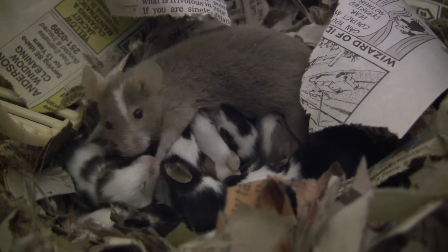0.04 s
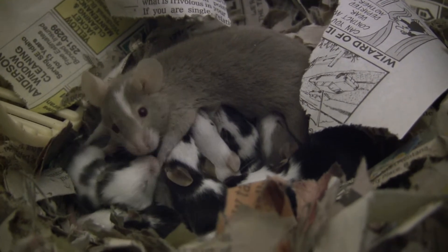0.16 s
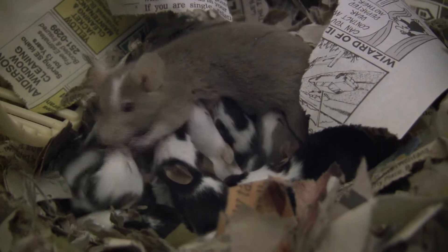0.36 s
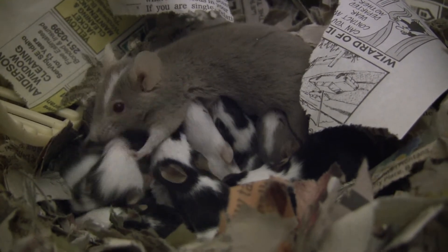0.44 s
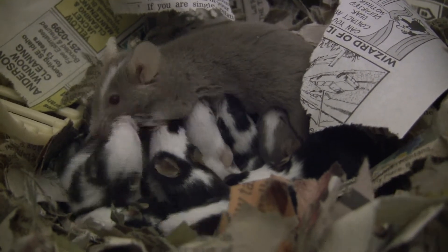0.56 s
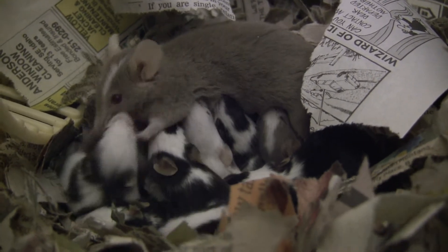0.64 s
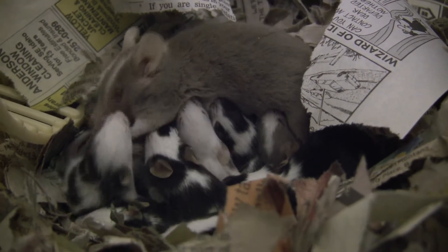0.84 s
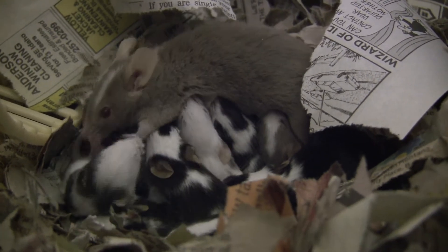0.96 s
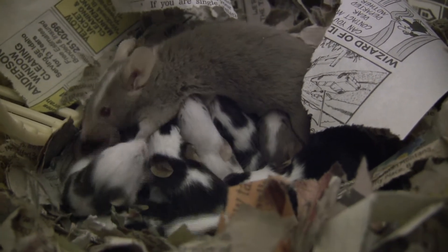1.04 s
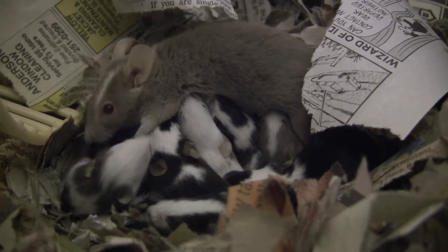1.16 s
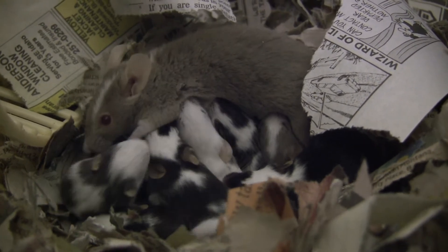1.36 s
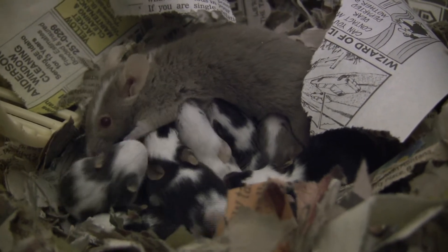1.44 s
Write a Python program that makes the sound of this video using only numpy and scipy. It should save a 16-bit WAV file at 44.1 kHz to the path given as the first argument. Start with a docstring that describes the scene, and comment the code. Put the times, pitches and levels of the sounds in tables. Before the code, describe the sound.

Baby mice squeak three times over steady hiss, low hum and a faint high whine. The first, loudest squeak runs 0.2-0.39 seconds, the second 0.49-0.7, the softer third 0.89-1.1. Each thin whistle breaks into buzzing rasp, then ends clean and higher. Very soft bedding shuffles come between 0.86 and 1.5; bright paper ticks start at 1.26, sharpest near 1.42. Close, mono, slight short room tail.

```python
"""A quiet room opens on steady filtered-noise hiss and low hum, with a faint whine of thin sines that waver
slightly and quickly in pitch. Baby mice in a paper nest then squeak three times, from 0.2, 0.49 and 0.89 s:
each is a thin whistle near 4-5 kHz with two overtones that breaks into rasps of random puffs and split-pitch
buzzes, then ends clean and higher. Soft shuffles of band-shaped noise run from the third squeak to near 1.5 s.
Paper ticks, bursts of noise through bright resonances, follow the squeaks from 1.26 s."""
import sys
import numpy as np
from scipy import signal
from scipy.fft import rfft, irfft
from scipy.io import wavfile

SR = 44100
rng = np.random.default_rng(int(sys.argv[2]) if len(sys.argv) > 2 else 0)


def waveform_to_disk(signal):
    """Save audio, clipped to [-1, 1], as 16-bit WAV at the path in sys.argv[1]."""
    frames = np.transpose(np.atleast_2d(signal))
    scaled = np.clip(frames, -1, 1) * 32767
    samples = np.round(scaled).astype(np.int16)
    wavfile.write(sys.argv[1], SR, samples)


N = 66150
T = np.arange(N) / SR  # s

# steady room hiss and low hum: (frequency [Hz], relative level [dB])
HISS_COLOUR = [(25, -13.5), (55, -11), (90, -1.5), (125, 0), (165, 3), (215, -11), (310, -5.5),
               (420, -11.5), (620, -9), (800, -9), (950, 3), (1130, -1), (1300, -3), (2000, -4.5),
               (3300, -7), (4500, -7.5), (5050, -4.5), (5700, -7.5), (7200, -11), (8000, -11),
               (9200, -15.5), (11200, -14.5), (12300, -27.5), (15500, -25)]
HISS_DB = -48.5  # rms
# steady whine lines: (frequency [Hz], rms level [dB])
WHINE_LINES = [(1168, -63), (4969, -60), (5550, -64), (5776, -66.5), (8032, -77)]
WHINE_DRIFT_HZ, WHINE_DRIFT_RATE_HZ = 7.06, 25.6  # rms pitch waver and its rate
ROOM_T60_S, ROOM_DB = 0.15, -14  # decay time and tail level

# ticks of the paper bedding: (time [s], level before the low-pass [dB], decay time to -60 dB [s])
TICKS = [(1.262, -46, 0.24), (1.3548, -46.5, 0.16), (1.4167, -37.5, 0.04), (1.4215, -46, .06)]
# resonances of the ticks: (frequency [Hz], width [Hz], gain [dB])
TICK_MODES = [(3120, 360, -9), (4030, 240, 2), (4975, 135, 7.5), (6030, 130, 0.5), (6200, 200, -14),
              (7630, 250, -27)]
TICK_TOP_HZ = 10000
# soft shuffles of bodies in the bedding: (centre time [s], length [s], centre frequency [Hz], level [dB])
SHUFFLES = [(0.862, 0.013, 13490, -61), (.96, 0.077, 426, -63), (1.127, 0.048, 310, -59.5),
            (1.485, 0.038, 148.6, -52)]

# course of each squeak before roughness and microphone colour:
# (time [s], pitch [Hz], whistle level [dB], octave level [dB])
FIRST_SQUEAK = [(0.2, 4316, -44, -62), (0.204, 4364, -38, -57), (0.216, 4430, -37, -46),
                (0.226, 4196, -33.5, -29), (0.234, 4111, -22, -45), (0.248, 4088, -24, -52.5),
                (0.274, 3724, -33, -30), (0.296, 3892, -29, -41.5), (0.316, 3896, -23.5, -45),
                (0.328, 3882, -31, -33), (0.342, 3908, -25, -46), (0.354, 4484, -30.5, -36),
                (0.366, 4495, -31, -41), (0.374, 4879, -26.5, -45), (0.386, 5050, -41, -68),
                (0.392, 4921, -71, -68)]
SECOND_SQUEAK = [(0.486, 4099, -51, -68), (0.49, 4100, -33.5, -63), (0.496, 3802, -33.5, -30.5),
                 (0.506, 3892, -30, -38.5), (0.514, 3828, -39, -41), (0.524, 3712, -34.5, -33),
                 (0.532, 4092, -30.5, -56), (0.544, 4116, -27.5, -50), (0.59, 4285, -41.5, -42),
                 (0.594, 4447, -36.5, -54), (0.624, 4570, -31, -54), (0.632, 4490, -44.5, -38),
                 (0.642, 4411, -37, -58), (0.656, 5047, -30, -80), (0.664, 5062, -29.5, -60),
                 (0.694, 4756, -45, -73), (0.7, 4559, -53, -73)]
THIRD_SQUEAK = [(0.893, 4053, -39, -64), (0.895, 4077, -45, -66), (0.925, 4095, -43.5, -68),
                (0.933, 4733, -33, -60), (0.941, 5009, -31, -55), (0.957, 5023, -28.5, -41.5),
                (0.993, 5092, -38, -47), (1.011, 5026, -34.5, -56), (1.029, 5370, -43, -52.5),
                (1.041, 5550, -32.5, -54), (1.057, 5466, -34.5, -60), (1.067, 5431, -58, -54),
                (1.075, 5249, -38.5, -77), (1.081, 5120, -42.5, -66), (1.095, 5120, -49, -80)]
EDGE_S, SWITCH_S = 0.0036, 0.0025  # fade of a squeak; flip between clean and rough
THIRD_DB, THIRD_OCTAVE_DB = -36, -15  # third harmonic, relative to the whistle and to the octave
WAVER, WAVER_HZ = 0.0026, 307  # pitch unsteadiness at all times (rms share of pitch, rate)
JITTER, JITTER_HZ = .022, 900  # added pitch scatter at full roughness (rms share of pitch, rate)
SHIMMER, SHIMMER_HZ = 0.62, 324  # level flutter at full roughness (depth 0-1, rate)
ROUGH_WHISTLE_DB, ROUGH_OCTAVE_DB = -2.5, -11.5  # change of the clean lines at full roughness

# chaotic stretches: (start [s], end [s], roughness [clipped to 0-1], starting level of the throat noise [dB],
# level slope [dB/s], growl relative to the throat noise [dB])
RASPS = [(0.204, .231, 1.07, -38.5, 80, -4.5), (.345, .376, 0.88, -35.5, -400, -6),
         (0.489, 0.498, 1, -39, 0, -3.5), (.529, 0.57, 0.53, -35.5, -34, -3.5),
         (0.569, .627, 1, -38, -15, -9.5), (0.625, 0.652, 0.57, -44, 0, -8.5),
         (0.897, 0.934, 0.78, -40.5, -2, -10.5), (0.933, 1.016, 0.74, -41.5, -7, -13)]
# throat colour of the rasp: (frequency [Hz], gain [dB])
THROAT_COLOUR = [(700, -19), (1200, -45), (3200, -14), (4100, -3), (5000, 9), (5700, 9), (6500, 3.5),
                 (7500, -3.5), (8700, -14), (10500, -4), (12500, -42), (15500, -38)]
# narrow resonances that band the rasp: (frequency [Hz], width [Hz], gain [dB])
RASP_BANDS = [(4035, 73, 6), (4630, 90, -5), (5090, 125, 8), (5500, 120, -2), (5760, 130, 0),
              (6440, 170, -0.5), (7400, 150, -5), (8580, 100, -10), (9630, 400, -19)]
BANDS_DB = 1.5  # relative to the broad throat colour
# colour of the low growl in the rasp: (frequency [Hz], gain [dB])
GROWL_COLOUR = [(500, -28), (900, -3), (1300, 3), (1800, 0.5), (2500, 0), (3300, -3.5), (5000, -38)]
# split-pitch stretches: (start [s], end [s], cycles per repeat, peak level of a line before colour [dB])
SPLITS = [(0.205, 0.231, 3, -33), (0.355, 0.366, 2, -49), (0.523, 0.533, 2, -40), (0.53, 0.562, 3, -38.5),
          (0.627, 0.648, 2, -46.5), (0.93, 0.984, 2, -49.5), (0.988, 1.032, 2, -43.5)]
# colour of the split-pitch lines: (frequency [Hz], gain [dB])
SPLIT_COLOUR = [(1000, -33), (1500, -5), (2500, -4), (3000, -15), (4500, -9), (5800, -0.5), (7400, -9),
                (8700, -16), (10300, -18.5), (11500, -21), (15000, -34)]
# treble roll-off of the microphone on the voice: (frequency [Hz], gain [dB])
MIC_COLOUR = [(9000, -1), (12300, -4), (13500, -11), (15500, -13)]
TOP_HZ = 15750  # the recorder's upper edge


def amp(db):
    """Decibels to gain."""
    return 10 ** (np.asarray(db) / 20)


def unit(x):
    """Scale to an rms of 1."""
    return x / np.sqrt(np.mean(x ** 2))


def colour(x, points):
    """Filter by a curve of (frequency [Hz], gain [dB]) points, joined on a log-frequency axis."""
    hz, db = np.array(points, float).T
    f = np.maximum(np.arange(N // 2 + 1) * SR / N, 1)
    gain = amp(np.interp(np.log(f), np.log(hz), db))
    return irfft(rfft(x) * gain, N)


def ring(x, modes):
    """Pass through parallel resonances given as (frequency [Hz], width [Hz], gain [dB]); rms 1."""
    total = np.zeros(N)
    for hz, width, db in modes:
        b, a = signal.iirpeak(hz, hz / width, SR)
        total += amp(db) * signal.lfilter(b, a, x)
    return unit(total)


def wobble(hz):
    """Smooth random motion with a soft limit near the given rate and an rms of 1."""
    f = np.arange(N // 2 + 1) * SR / N
    return unit(irfft(rfft(rng.standard_normal(N)) * np.exp(-(f / hz) ** 2), N))


def gate(start, end, edge):
    """1 between two times, with soft edges centred on them."""
    ramp = np.clip(np.minimum(T - start, end - T) / edge + .5, 0, 1)
    return np.sin(np.pi / 2 * ramp) ** 2


def background():
    """Steady coloured noise for hiss and hum, with thin whine lines that waver slightly in pitch."""
    hiss = amp(HISS_DB) * unit(colour(rng.standard_normal(N), HISS_COLOUR))
    whine = np.zeros(N)
    for hz, db in WHINE_LINES:
        pitch = hz + WHINE_DRIFT_HZ * wobble(WHINE_DRIFT_RATE_HZ)
        whine += amp(db) * np.sqrt(2) * np.sin(2 * np.pi * np.cumsum(pitch) / SR)
    return hiss + whine


def room(x):
    """Faint, short scatter from the walls around the nest: a decaying noise tail under the direct sound."""
    tail = rng.standard_normal(N) * np.exp(-np.log(1000) * T / ROOM_T60_S)
    tail /= np.linalg.norm(tail)
    return x + amp(ROOM_DB) * signal.fftconvolve(x, tail)[:N]


def shuffles():
    """Bodies rub softly in the bedding: noise peaking at one frequency swells and fades."""
    out = np.zeros(N)
    for centre, length, hz, db in SHUFFLES:
        rub = colour(rng.standard_normal(N), [(hz / 10, -80), (hz, 0), (hz * 10, -80)])
        out += amp(db) * unit(rub) * gate(centre - length / 2, centre + length / 2, length / 2)
    return out


def ticks():
    """Noise rings a few bright resonances and is let through in sudden bursts that die away."""
    ringing = ring(rng.standard_normal(N), TICK_MODES)
    b, a = signal.butter(2, TICK_TOP_HZ, fs=SR)
    crackle = signal.lfilter(b, a, ringing)
    envelope = np.zeros(N)
    for start, db, t60 in TICKS:
        decay = np.exp(-np.log(1000) * np.maximum(T - start, 0) / t60)
        envelope += (T >= start) * amp(db) * decay
    return crackle * envelope


def squeak_controls():
    """Pitch, whistle gain and octave gain through time, silent between squeaks."""
    squeaks = [np.array(s, float) for s in (FIRST_SQUEAK, SECOND_SQUEAK, THIRD_SQUEAK)]
    rows = np.vstack(squeaks)
    hz, whistle_db, octave_db = (np.interp(T, rows[:, 0], column) for column in rows.T[1:])
    voiced = sum(gate(s[0, 0], s[-1, 0], EDGE_S) for s in squeaks)
    return hz, amp(whistle_db) * voiced, amp(octave_db) * voiced


def split_pitch(phase):
    """The voice repeats only every second or third cycle, which puts lines between the harmonics."""
    out = np.zeros(N)
    for start, end, cycles, db in SPLITS:
        n = int(round(cycles))
        lines = np.zeros(N)
        for k in range(1, 2 * n + 2):
            if k != n:  # leave out the whistle's own pitch
                lines += np.sin(k * phase / n + rng.uniform(0, 2 * np.pi))
        out += gate(start, end, SWITCH_S) * amp(db) * lines
    return colour(out, SPLIT_COLOUR)


def rasp(phase):
    """Chaotic cycles: noise puffs, swelling once per cycle, ring the throat with a growl below."""
    puffs = rng.standard_normal(N) * (1 + np.cos(phase))
    broad = unit(colour(puffs, THROAT_COLOUR))
    throat = unit(broad + amp(BANDS_DB) * ring(puffs, RASP_BANDS))
    growl = unit(colour(puffs, GROWL_COLOUR))
    out = np.zeros(N)
    for start, end, _, db, slope, growl_db in RASPS:
        level = amp(db + slope * (np.clip(T, start, end) - start))
        out += gate(start, end, SWITCH_S) * level * (throat + amp(growl_db) * growl)
    return out


def mice():
    """A whistle of three harmonics whose pitch and strength scatter when the voice turns rough."""
    hz, whistle, octave = squeak_controls()
    rough = np.clip(sum(r * gate(start, end, SWITCH_S) for start, end, r, *_ in RASPS), 0, 1)
    unsteady = 1 + WAVER * wobble(WAVER_HZ) + JITTER * rough * wobble(JITTER_HZ)
    phase = 2 * np.pi * np.cumsum(hz * unsteady) / SR
    whistle = whistle * amp(ROUGH_WHISTLE_DB * rough)
    octave = octave * amp(ROUGH_OCTAVE_DB * rough)
    third = amp(THIRD_DB) * whistle + amp(THIRD_OCTAVE_DB) * octave
    harmonics = whistle * np.sin(phase) + octave * np.sin(2 * phase) + third * np.sin(3 * phase)
    tone = np.sqrt(2) * harmonics  # gains are rms levels
    flutter = 1 + SHIMMER * rough * np.tanh(2 * wobble(SHIMMER_HZ))
    voice = (tone + split_pitch(phase)) * flutter + rasp(phase)
    return colour(voice, MIC_COLOUR)


def scene():
    """The nest in its room over the steady background, in mono."""
    nest = mice() + ticks() + shuffles()
    return (room(nest) + background())[None]


def record(dry):
    """The recorder cuts the top with a steep elliptic low-pass."""
    low_pass = signal.ellip(10, .2, 80, TOP_HZ, fs=SR, output="sos")
    return signal.sosfilt(low_pass, dry)


dry = scene()
out = record(dry)
waveform_to_disk(out)
```